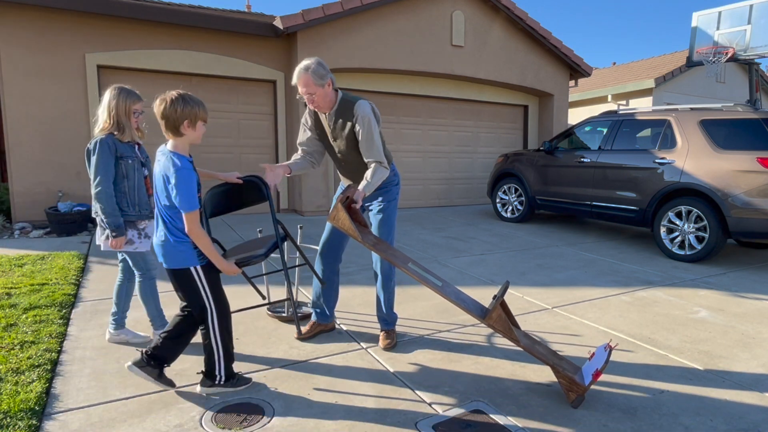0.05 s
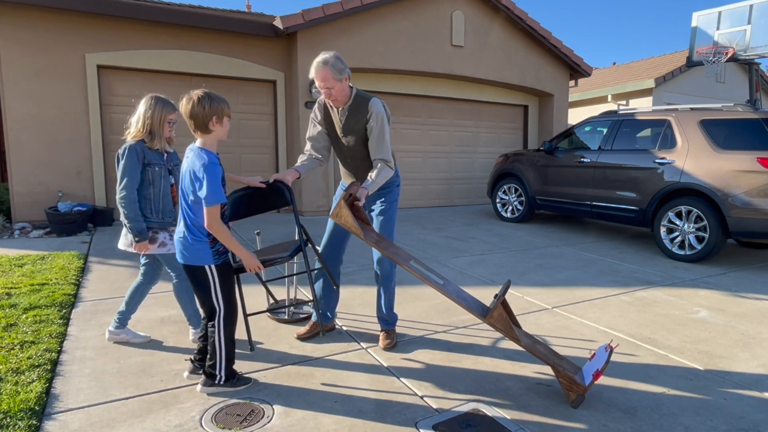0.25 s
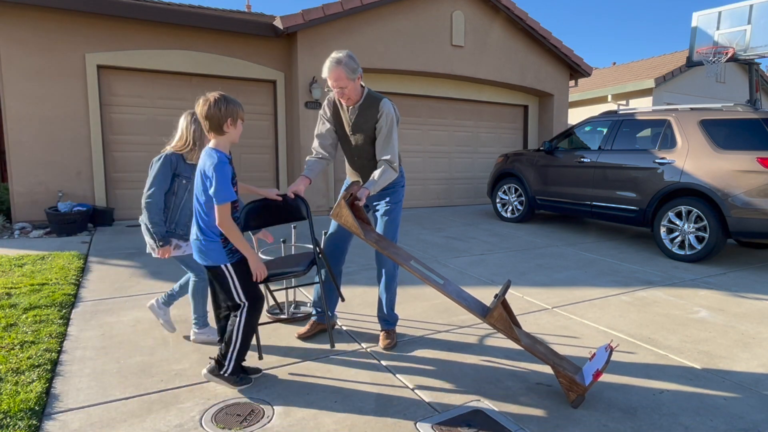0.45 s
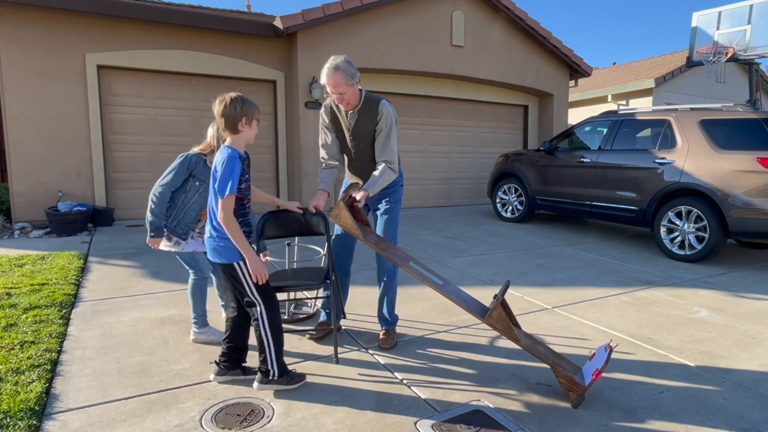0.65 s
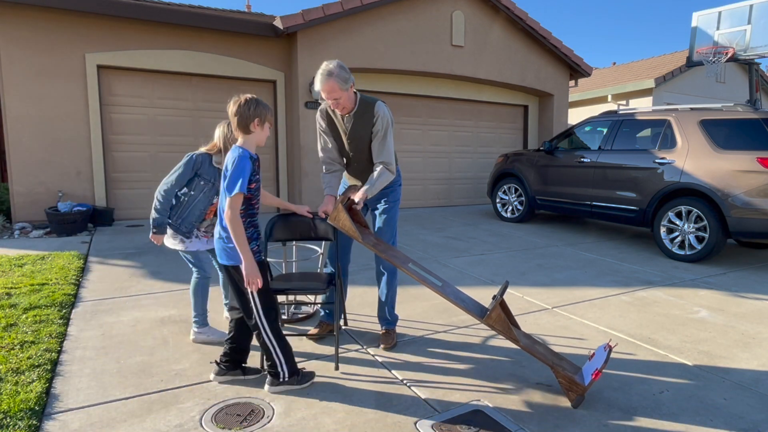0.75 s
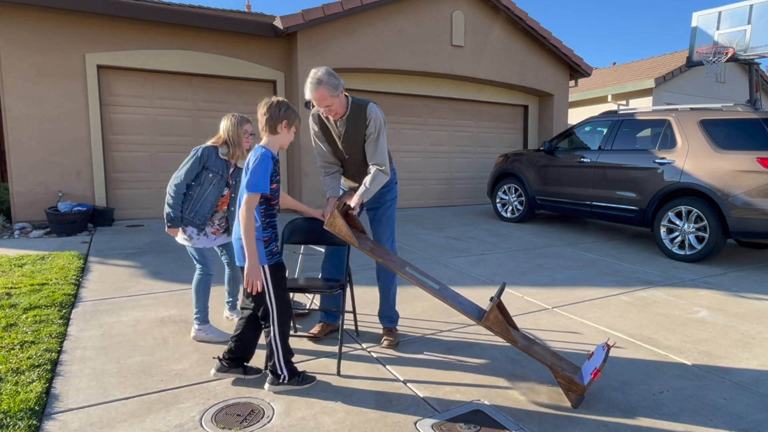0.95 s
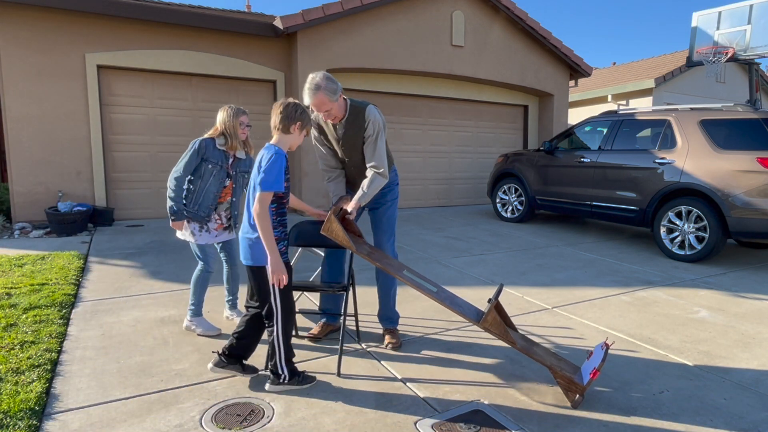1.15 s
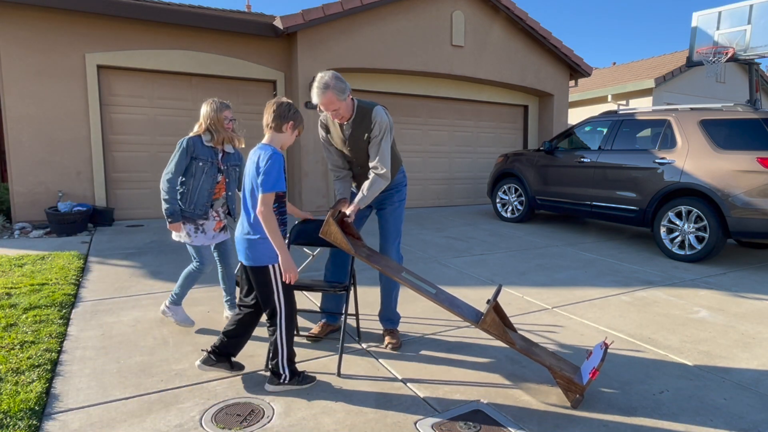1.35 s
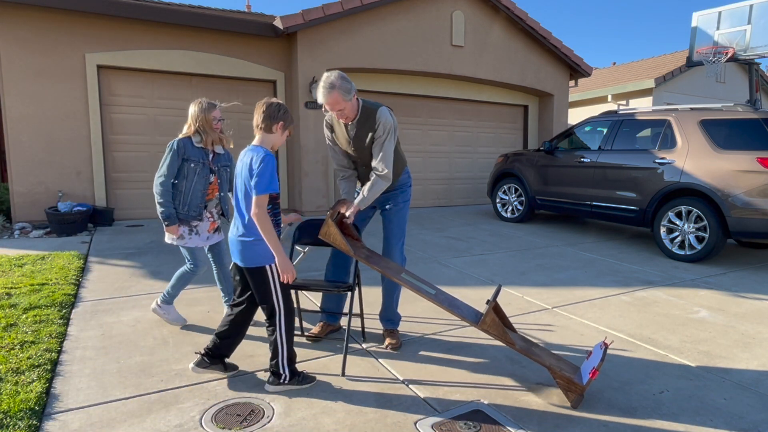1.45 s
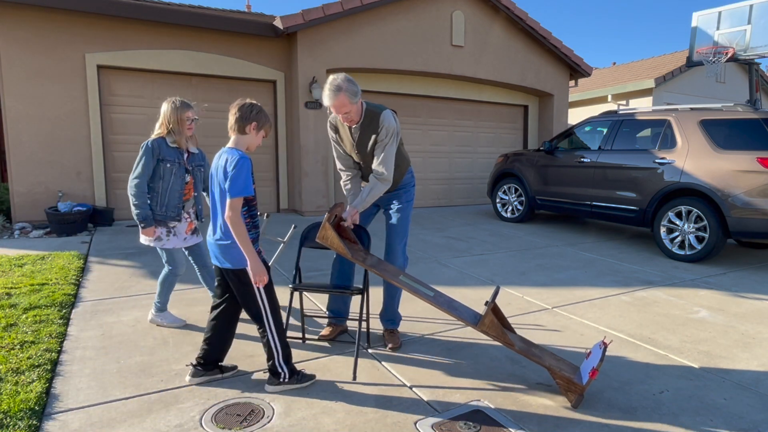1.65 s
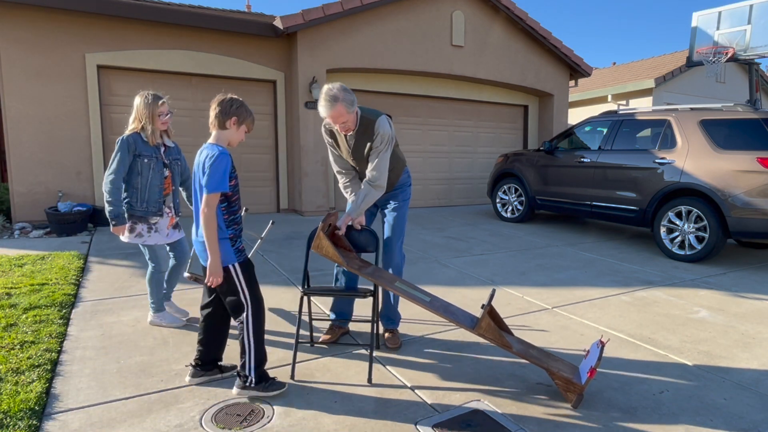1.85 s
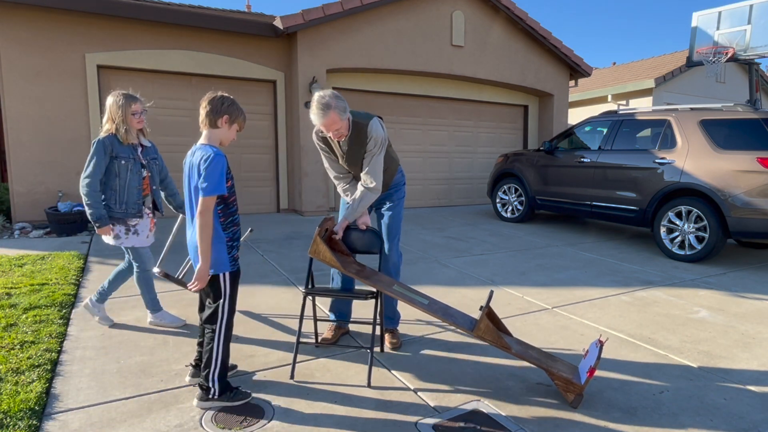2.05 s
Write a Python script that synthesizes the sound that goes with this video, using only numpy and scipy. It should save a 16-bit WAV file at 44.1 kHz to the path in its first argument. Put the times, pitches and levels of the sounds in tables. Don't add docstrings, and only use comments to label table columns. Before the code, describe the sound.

A steel folding chair ticks at its loose joints while carried, lands on concrete with a jarring, scraping clatter, pauses with a faint hinge squeak, then is dragged again; close, dry outdoor sound, almost no background.

```python
import sys
import numpy as np
from scipy import signal
from scipy.fft import irfft
from scipy.io import wavfile
from scipy.ndimage import uniform_filter1d

SR = 44100
rng = np.random.default_rng(int(sys.argv[2]) if len(sys.argv) > 2 else 0)


def unload_audio(sound):
    columns = np.transpose(np.atleast_2d(sound))
    steps = np.round(np.clip(columns, -1, 1) * 32767)
    wavfile.write(sys.argv[1], SR, steps.astype(np.int16))


def volts_from_decibels(level):
    exponent = np.asarray(level, float) / 20
    return 10 ** exponent


N = 93183
TOP_HZ = 15850


def evened(x):
    return x / np.sqrt(np.mean(x ** 2) + 1e-20)


def read(points, hz):
    f, value = np.transpose(points)
    return np.interp(np.log(hz + 1), np.log(f + 1), value)


def add(mix, s, sound):
    part = mix[..., max(round(s * SR), 0):][..., :sound.shape[-1]]
    part += sound[..., :part.shape[-1]]


def band(x, order, edges, kind):
    return signal.sosfilt(signal.butter(order, edges, kind, fs=SR, output="sos"), x)


def cluster(hz, span, t60, chance, t):
    place, strength = chance[:9, None], chance[9:, None]
    f = hz * span ** (place - .25)
    ring = (strength * np.sin(2 * np.pi * (f * t + 0.37 * place))).sum(0)
    rise = np.sin(np.pi / 2 * np.minimum(t / .0012, 1)) ** 2
    ring *= volts_from_decibels(-60 * t / t60) * rise
    return ring / abs(ring).max()


def crack(noise, t, top_hz):
    dulled = signal.lfilter([1], [1, -.7], noise)
    burst = band(dulled, 2, [1800, top_hz], "band") * volts_from_decibels(-60 * t / 0.018)
    return burst / abs(burst).max()


GRIT_PER_S, GRIT_DB = 3800, 4.5


def grit():
    size = volts_from_decibels(GRIT_DB * np.minimum(rng.exponential(1, N), 4)) * rng.choice([-1., 1.], N)
    return evened(size * (rng.random(N) < GRIT_PER_S / SR))


# f/Hz, level/dB [dB per Hz]
CHAIR_TONE = [(60, -66), (190, -29.5), (300, -11.5), (620, 0.5), (1100, -7.5), (2200, -11.5), (3800, -10.5),
              (7000, -21), (15800, -28.5)]
# f/Hz, t60/s
CHAIR_RING = [(100, 0.36), (500, 0.077), (1500, 0.075), (4000, 0.062), (9000, 0.037), (15000, 0.042)]
# f/Hz, level/dB, t60/s
FRAME_TUBES = [(330, 4, .15), (366, 4, .15), (478, 6, .15), (705, 4, .1), (1121, 5, .14), (3500, 5, .15),
               (3795, 4, .15), (11230, 10, .14), (11590, 14, .16), (12050, 3, .12)]
PAN_HZ, RIVET_HZ = 1300, 6500
MODE_SPREAD_DB, DIRECT_DB = 8, -0.5


def chair(count=700, size=9000):
    t = np.arange(size) / SR
    hz = np.linspace(90, 15900, count) + rng.uniform(-19.5, 12, count)
    low_hz = np.linspace(70, 1500, 60) + rng.uniform(-23.5, 9.9, 60)
    hz = np.concatenate([hz, low_hz])
    uneven = volts_from_decibels(np.clip(rng.standard_normal(len(hz)), -1, 1))
    t60 = np.clip(read(CHAIR_RING, hz), .01, 1) * uneven
    db = np.zeros(len(hz))
    tube_hz, tube_db, tube_t60 = np.transpose(FRAME_TUBES)
    hz = np.concatenate([hz, tube_hz])
    db = np.concatenate([db, tube_db])
    t60 = np.concatenate([t60, tube_t60])
    modes = np.sin(2 * np.pi * hz[:, None] * t) * np.exp(-np.log(1000) * t / t60[:, None])

    shape = (4, len(hz))
    legs = volts_from_decibels(MODE_SPREAD_DB * np.minimum(rng.standard_normal(shape), 1))
    legs = legs * rng.choice([-1., 1.], shape)
    legs = legs * volts_from_decibels(read(CHAIR_TONE, hz) + db) / np.sqrt(t60)
    legs = np.vstack([legs, legs[0] * volts_from_decibels(-db)])
    part = (hz > PAN_HZ).astype(int) + (hz > RIVET_HZ)
    out = np.array([[(leg * (part == p)) @ modes for p in range(3)] for leg in legs])
    out /= np.linalg.norm(out, axis=2, keepdims=True)

    bins = np.fft.rfftfreq(size, 1 / SR)
    delay = np.exp(-2j * np.pi * bins * 64 / SR)
    click = irfft(volts_from_decibels(read(CHAIR_TONE, bins)) * (bins > PAN_HZ) * delay, size)
    click *= np.sin(np.pi * np.minimum(t * SR / 128, 1)) ** 2
    out[:, 1] += volts_from_decibels(DIRECT_DB) * click / np.linalg.norm(click)
    return out


# t/s, level/dB, seat pan/dB, rivets/dB, fade/s
LANDING_JOLTS = [(.526, -31, 0.5, -38, 0.0097), (.553, -33, 2.5, -40, 0.011), (.592, -38, 4, -35, 0.0134),
                 (.686, -34, 5.5, -33, 0.0071), (.701, -28, 13, -13, 0.0066),
                 (.721, -24, -2, -32.5, 0.0063), (.757, -20.5, 10, -33, 0.013),
                 (.782, -19.5, -5, -17.5, 0.0074), (.831, -20.5, 13.5, -14, 0.011),
                 (.848, -18, 11.5, -8, 0.0099), (.870, -19, 8.5, -10.5, 0.012),
                 (.897, -11.5, 4, -13.5, 0.019), (.937, -15.5, 4.5, -15.5, 0.012),
                 (.960, -24, 7.5, -18.5, 0.005), (.989, -10.5, 6.5, -29.5, 0.0044),
                 (1.001, -16, 8, -23.5, 0.0076), (1.031, -21.5, 3, -11.5, 0.012),
                 (1.077, -18, 2, -14, 0.0031), (1.136, -20.5, 6.5, -23, 0.011),
                 (1.171, -22.5, -0.5, -9, 0.019), (1.212, -16, -13, -11.5, 0.0076),
                 (1.266, -29, -2.5, -10, 0.011)]
# t/s, level/dB, seat pan/dB, rivets/dB, fade/s
DRAG_JOLTS = [(1.525, -21, -1, -16, 0.0092), (1.539, -11.5, -0.5, -5.5, 0.0081),
              (1.564, -20, 12, -4.5, 0.013), (1.586, -18.5, 4, -25, 0.0086), (1.618, -22.5, 9, -7, 0.0056),
              (1.655, -25.5, 0.5, -23, 0.0055), (1.725, -17.5, 4.5, -29, 0.0021),
              (1.74, -14, 3.5, -26, 0.01), (1.771, -21, 2.5, -30, 0.022), (1.795, -9, 6.5, -18, 0.0074),
              (1.818, -13.5, 6, -15, 0.014), (1.844, -16.5, 4, -15, 0.023), (1.878, -30, 11, -1, 0.009),
              (1.921, -25, 8, -26, 0.011), (1.957, -37, 16.5, -31, 0.022), (2.018, -22, 5, -20, 0.012),
              (2.046, -7, -0.5, -6.5, 0.016), (2.062, -14, -1.5, -11, 0.013),
              (2.088, -13, -2.5, -29, 0.0094)]
# t/s, level/dB, seat pan/dB, rivets/dB, fade/s
CARRY_JOLTS = [
    (.0, -39, -1, -8, 0.016),
    (0.04, -38.5, 7, -12, 0.0049),
    (0.122, -55, -29, 0, 0.0076),
    (0.263, -73, 20, 10, 0.02),
    (0.368, -57.5, -14, 4, 0.013),
    (0.437, -54, 3.5, -3, 0.013),
    (0.664, -57, 16, -14, 0.01),
]
# t/s, level/dB
SCRAPE = [(.47, -71), (.6, -58), (.66, -68), (.75, -45), (.94, -30), (1.27, -53), (1.36, -82.5),
          (1.49, -71), (1.55, -26), (1.7, -44), (1.85, -33), (2.0, -44), (2.11, -30.5)]
JOLT_DB, SCRAPE_DB, RISE_SHARE = -11.5, -6, 0.7
SCRAPE_PARTS_DB = np.array([[2.5], [0], [-15]])


def clatter():
    clicks = np.array([grit() for _ in range(5)])
    soft = band(clicks, 2, [250, PAN_HZ], "band")
    felt = np.stack([evened(soft), clicks, clicks], 1) ** 2
    force, t = np.zeros((5, 3, N)), np.arange(N) / SR
    on_slab = LANDING_JOLTS + DRAG_JOLTS
    for k, (s, db, pan_db, rivet_db, fade) in enumerate(on_slab + CARRY_JOLTS):
        u = (t - s) / np.clip(fade, .002, .05)
        shape = np.where(u < 0, np.exp(-(u / RISE_SHARE) ** 2), np.exp(-abs(u)))
        leg = k % 4 if k < len(on_slab) else 4
        even = np.sqrt(shape @ shape / (felt[leg] @ shape ** 2))[:, None]
        parts_db = np.array([[pan_db], [0], [rivet_db]])
        force[leg] += volts_from_decibels(JOLT_DB + db + parts_db) * even * shape
    scrape_db = np.interp(t, *np.transpose(SCRAPE), left=-np.inf) + SCRAPE_DB
    force[:4] += volts_from_decibels(scrape_db + SCRAPE_PARTS_DB) / 2
    return signal.fftconvolve(force * clicks[:, None], chair(), axes=2)[..., :N].sum((0, 1))


# t/s, level/dB, seat pan f/Hz, crack/dB
FOOT_BLOWS = [(.699, -22, 572, -19), (0.752, -16.5, 584, -18), (.762, -10.5, 612, -20),
              (.779, -22, 880, -13), (.832, -15.5, 586, -13), (.847, -15, 715, -15), (.858, -24, 710, -3),
              (.872, -19, 680, -4.5), (.893, -15.5, 620, -24), (.899, -11, 796, -14),
              (.936, -10, 700, -5.5), (.961, -18, 900, -8), (.991, -13.5, 610, -11), (1.0, -9, 677, -20),
              (1.131, -22, 600, -26), (1.171, -24, 850, 8), (1.211, -26, 950, 1.5), (1.545, -12.5, 870, 0),
              (1.551, -17, 890, -12), (1.561, -12.5, 676, -11), (1.593, -17, 604, -6),
              (1.611, -22, 600, -22), (1.718, -25.5, 395, -30), (1.728, -19, 1215, -18),
              (1.739, -17, 700, -3), (1.786, -20, 805, -10), (1.797, -15, 554, -7), (1.818, -14, 780, -1),
              (1.825, -10.5, 594, -19), (1.849, -18.5, 580, -3.5), (1.888, -23.5, 480, -15),
              (2.014, -26, 790, -8)]
BLOW_T60, BLOW_SPAN = 0.021, 1.64


def blows():
    out, t = np.zeros(N), np.arange(3000) / SR
    events = FOOT_BLOWS + [(1.481, -47, 332, -38.5)]
    for s, db, hz, crack_db in events:
        knock = cluster(hz, BLOW_SPAN, BLOW_T60, rng.random(18), t)
        snap = volts_from_decibels(crack_db) * crack(rng.standard_normal(len(t)), t, TOP_HZ)
        add(out, s - .001, volts_from_decibels(db) * (knock + snap))
    return out


# t/s, level/dB, joint f/Hz, strut/dB, crack/dB
JOINT_TICKS = [(0.0197, -22, 1510, -27, -13.5), (0.0297, -23.5, 1435, -16.5, -16),
               (0.055, -27.5, 1425, -12.5, -24), (.0845, -29.5, 1390, -21, -27),
               (.092, -40, 1440, -4.5, -23), (.117, -37, 1390, -23, -18), (0.25, -42.5, 1506, -30, -25),
               (.255, -43.5, 1465, -29, -28), (0.367, -69, 1520, 19.5, 3), (0.411, -41.5, 1660, -30, -12),
               (0.425, -44, 1550, -17, -23), (.483, -40.5, 1670, 7, -14), (0.498, -30, 1456, -1, -22),
               (.514, -21, 1526, -13, -13), (0.525, -17.5, 1344, -17, -9.5), (.533, -18.5, 1390, -6.5, -18),
               (.550, -23.5, 1320, -6.5, -18), (.560, -20.5, 1094, -11, -15), (.586, -22, 1282, -14, -20),
               (.6, -32.5, 1413, -6.5, -15), (.612, -33, 1430, -5, -8), (.685, -22, 1625, -22, -15)]
JOINT_T60, JOINT_SPAN = 0.13, 1.75
STRUT_HZ, STRUT_T60, STRUT_SPAN = 737, 0.12, 1.2
SNAP_T60, TAIL_DB, TICK_TOP_HZ = .024, -9, 5500


def ticks():
    out, t = np.zeros(N), np.arange(6000) / SR
    snap = (volts_from_decibels(-60 * t / SNAP_T60) + volts_from_decibels(TAIL_DB)) / (1 + volts_from_decibels(TAIL_DB))
    for s, db, hz, strut_db, crack_db in JOINT_TICKS:
        joint = snap * cluster(hz, JOINT_SPAN, JOINT_T60, rng.random(18), t)
        strut = volts_from_decibels(strut_db) * cluster(STRUT_HZ, STRUT_SPAN, STRUT_T60, rng.random(18), t)
        strut *= np.minimum(t / 0.003, 1)
        click = volts_from_decibels(crack_db) * crack(rng.standard_normal(len(t)), t, TICK_TOP_HZ)
        add(out, s - .001, volts_from_decibels(db) * (joint + strut + click))
    return out


# t/s, level/dB, f/Hz
TUBE_PINGS = [(0.53, -40, 225), (.585, -44, 220), (1.168, -30, 5170), (1.211, -29, 3450),
              (1.214, -31, 5725), (1.262, -40, 2565), (1.263, -37, 3450), (1.264, -46, 7620),
              (1.266, -41, 5725), (1.616, -27, 3520), (1.652, -31, 3490), (1.80, -31, 10880),
              (2.044, -20, 4600)]


def pings():
    out, t = np.zeros(N), np.arange(6000) / SR
    for s, db, hz in TUBE_PINGS:
        add(out, s, volts_from_decibels(db) * cluster(hz, 1.015, .14, rng.random(18), t))
    return out


# t/s, level/dB, f/Hz
SHOE_STEPS = [
    (.06, -58, 85),
    (.25, -58, 85),
    (.47, -56, 80),
    (.61, -52, 90),
]


def steps():
    out, t = np.zeros(N), np.arange(3000) / SR
    swell = np.sin(np.pi * t / t[-1]) ** 2 * np.minimum(t / 0.016, 1)
    for s, db, hz in SHOE_STEPS:
        add(out, s, volts_from_decibels(db) * cluster(hz, 1.7, 0.6, rng.random(18), t) * swell)
    return out


# t/s, level/dB, f/Hz
HINGE = [
    (1.35, -80.5, 4250),
    (1.395, -63.5, 4350),
    (1.445, -64.5, 4400),
    (1.458, -81, 4370),
    (1.468, -52.5, 4420),
    (1.492, -66, 4340),
    (1.505, -60.5, 4400),
    (1.52, -75, 4400),
]
# pitch ratio, level/dB
HINGE_PARTNERS = [(0.635, -11), (1.43, -27)]
SQUEAK_WIDTH_HZ = 96


def squeak():
    t, (s, db, hz) = np.arange(N) / SR, np.transpose(HINGE)
    turns, out = np.cumsum(np.interp(t, s, hz)) / SR, np.zeros(N)
    for ratio, lift_db in [(0.99, 0.0012)] + HINGE_PARTNERS:
        a, b = band(rng.standard_normal((2, N)), 2, SQUEAK_WIDTH_HZ, "low")
        flutter = .6 + evened(a) + 1j * evened(b)
        out += volts_from_decibels(lift_db) * (flutter * np.exp(2j * np.pi * ratio * turns)).real
    return volts_from_decibels(np.interp(t, s, db, left=-np.inf, right=-np.inf) - 2.5) * out


YARD_DB, YARD_T60 = -16, 0.15


def yard(x):
    t = np.arange(SR // 3) / SR
    tail = rng.standard_normal(len(t)) * volts_from_decibels(-60 * t / YARD_T60) * (t > .008)
    taps = volts_from_decibels(YARD_DB) * tail / np.linalg.norm(tail)
    taps[0] = 1
    return signal.fftconvolve(x, taps)[:N]


# f/Hz, level/dB [dB per Hz]
AIR_TONE = [(60, -5), (300, -1), (750, -2.5), (1100, -17), (4000, -13), (6500, -22.5), (15000, -33.5)]
AIR_DB, PATCH_DB = -73, 3.3
GATE_S, GATE_WIDTH_S, GATE_DB = 0.19, 0.044, -12.5


def air():
    a, b, patches = rng.standard_normal((N // 128 + 6, 257, 3)).T
    patches = uniform_filter1d(patches, 3, 0)
    patches = evened(uniform_filter1d(patches, 8, 1))
    tone_db = read(AIR_TONE, np.fft.rfftfreq(512, 1 / SR))[:, None]
    z = (a + 1j * b) * volts_from_decibels(tone_db + PATCH_DB * patches)
    hiss = signal.istft(z, nperseg=512, noverlap=384)[1][:N]
    shut_db = GATE_DB * np.exp(-((np.arange(N) / SR - GATE_S) / GATE_WIDTH_S) ** 4)
    return volts_from_decibels(AIR_DB + shut_db) * evened(hiss)


def scene():
    frame = band(clatter() + blows(), 1, 170, "high")
    near = frame + ticks() + pings() + steps()
    return (yard(near) + squeak() + air())[None]


def band_limit(x):
    return signal.sosfilt(signal.butter(12, 16300, fs=SR, output="sos"), x)


def record(dry):
    cut = band(dry, 3, 130, "high")
    limit = signal.firwin(1023, TOP_HZ, window=("kaiser", 9), fs=SR)
    mix = signal.oaconvolve(cut, limit[None], "same")
    return band_limit(mix)


dry = scene()
out = record(dry)
unload_audio(out)
```